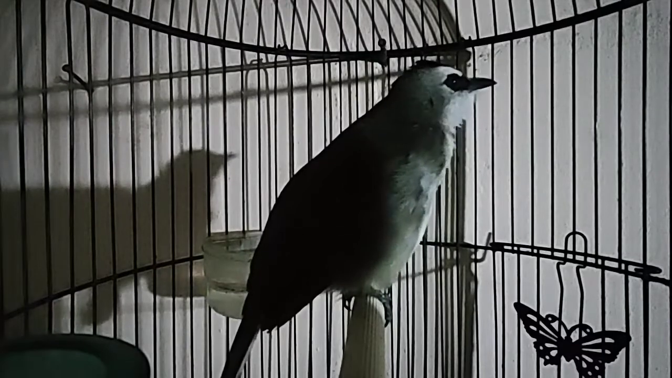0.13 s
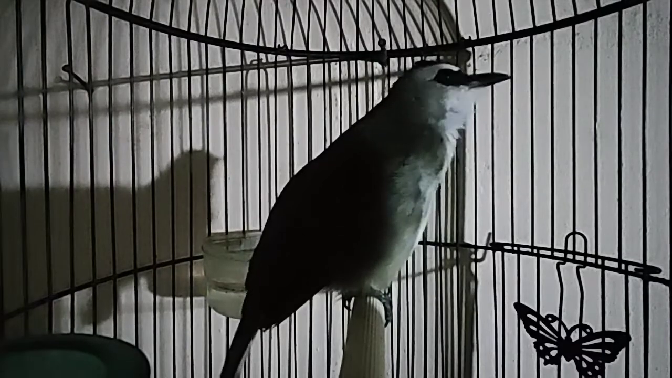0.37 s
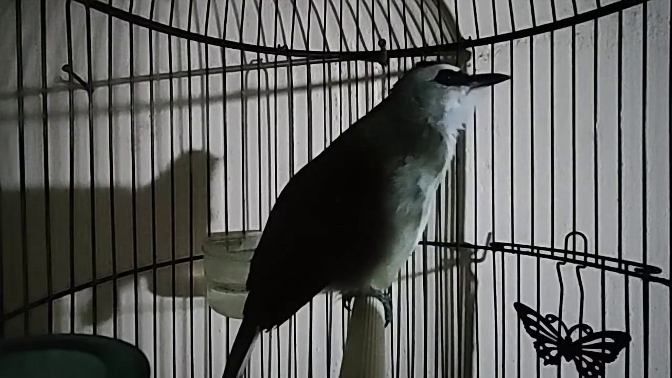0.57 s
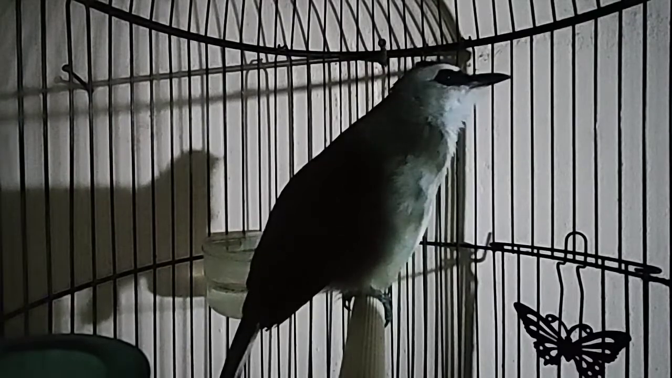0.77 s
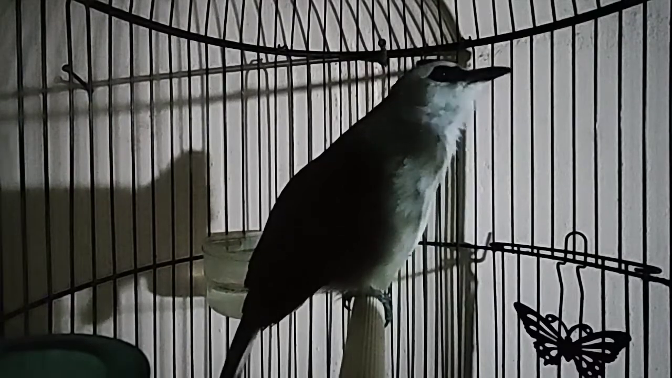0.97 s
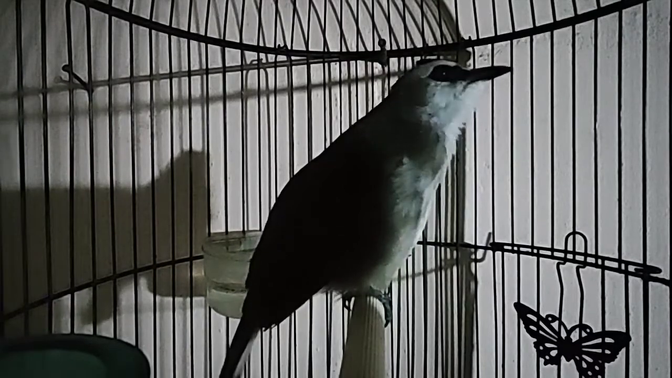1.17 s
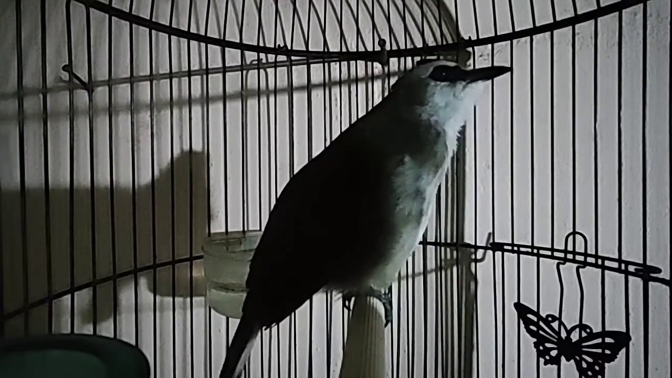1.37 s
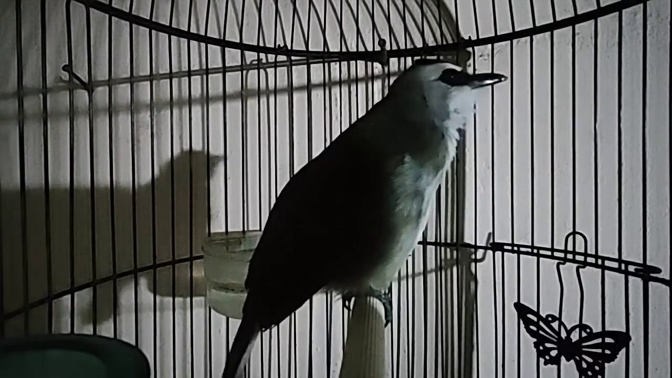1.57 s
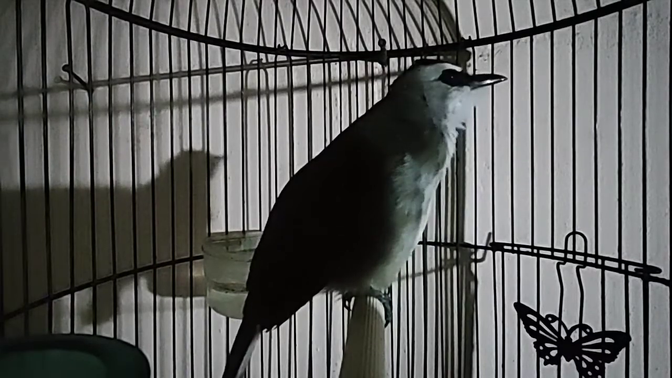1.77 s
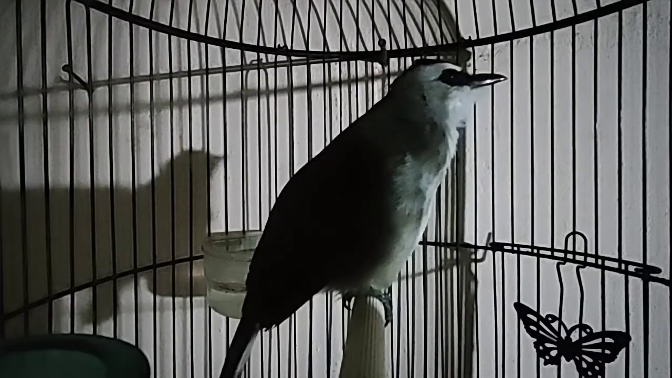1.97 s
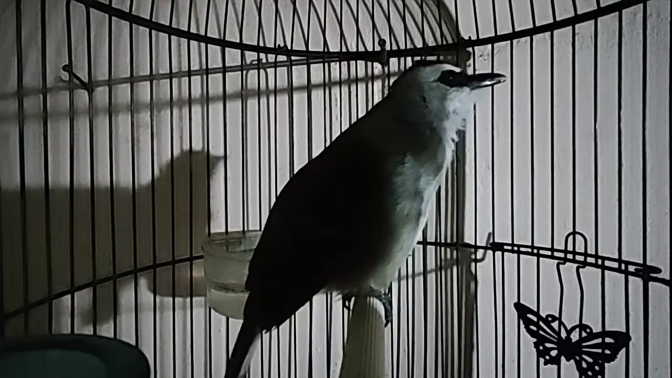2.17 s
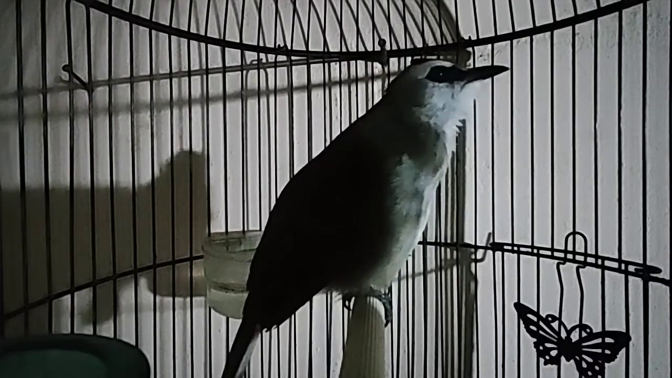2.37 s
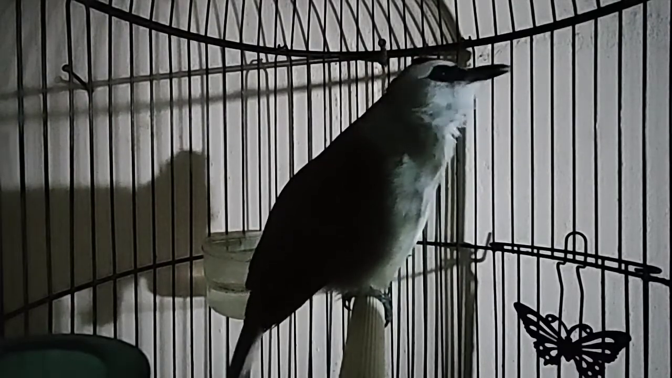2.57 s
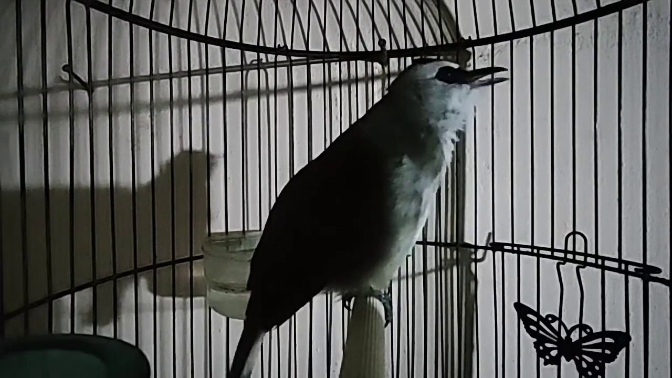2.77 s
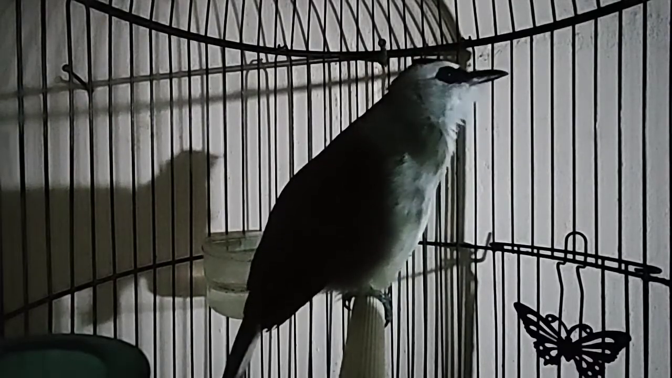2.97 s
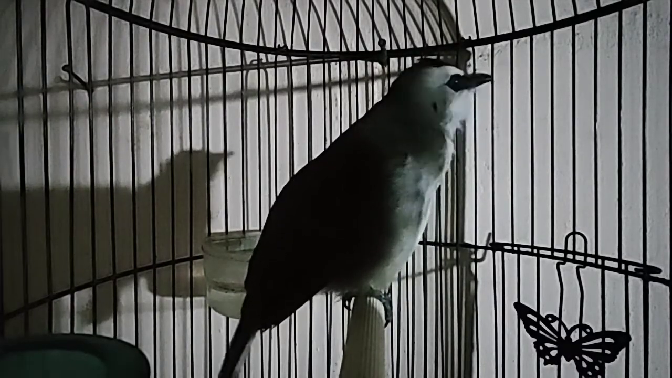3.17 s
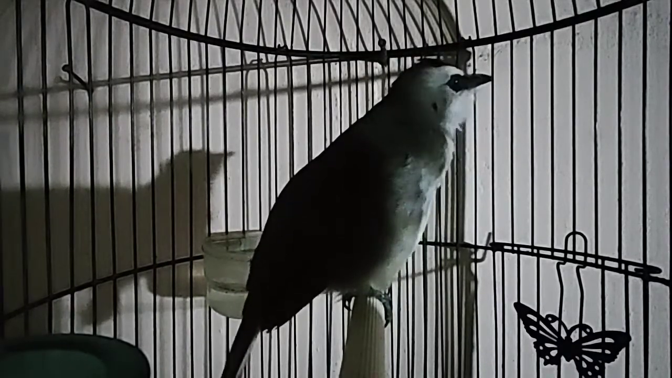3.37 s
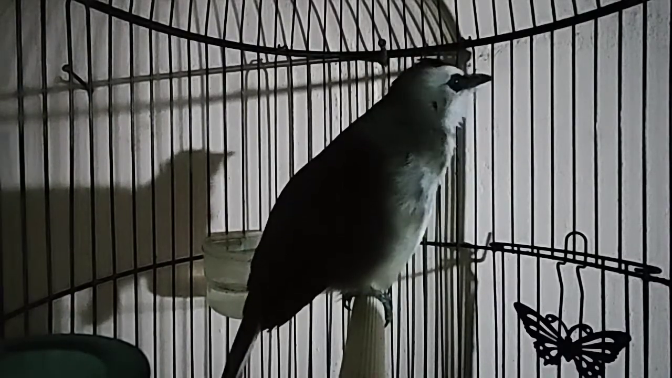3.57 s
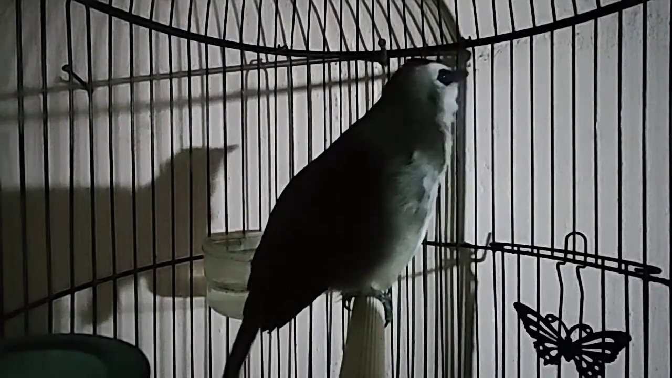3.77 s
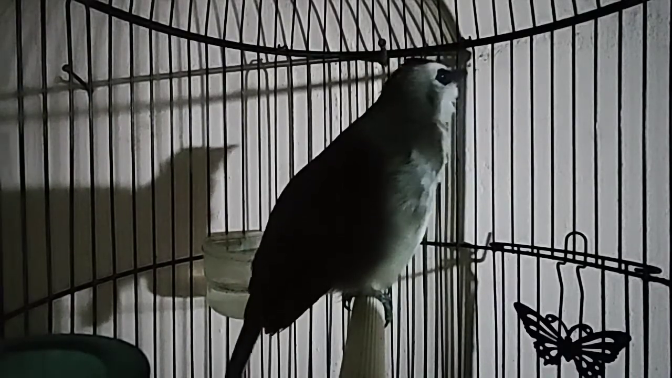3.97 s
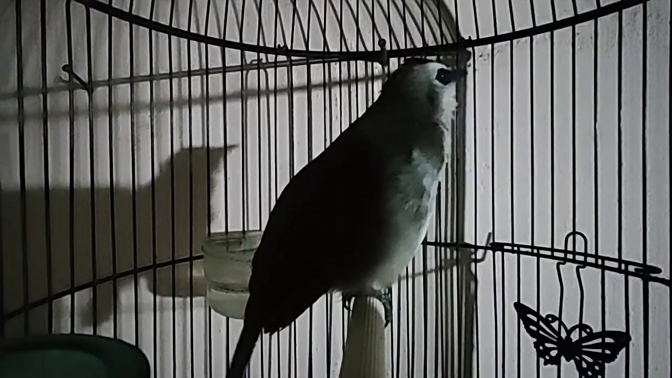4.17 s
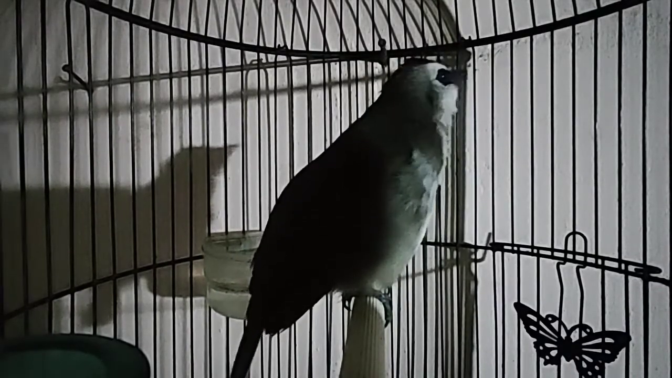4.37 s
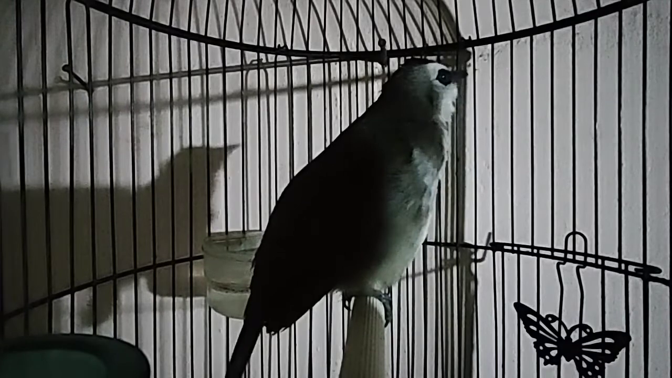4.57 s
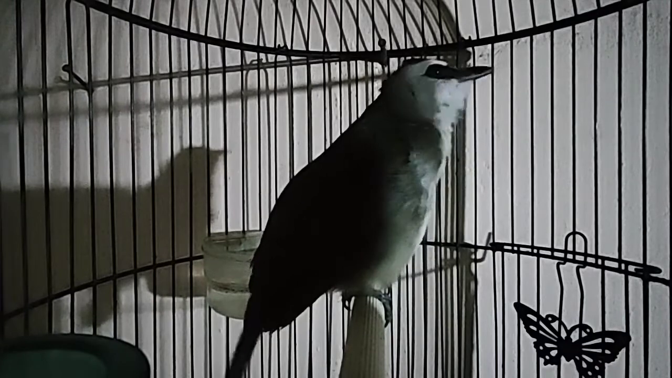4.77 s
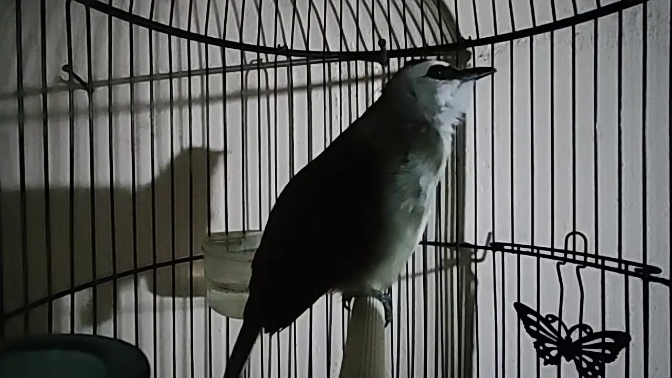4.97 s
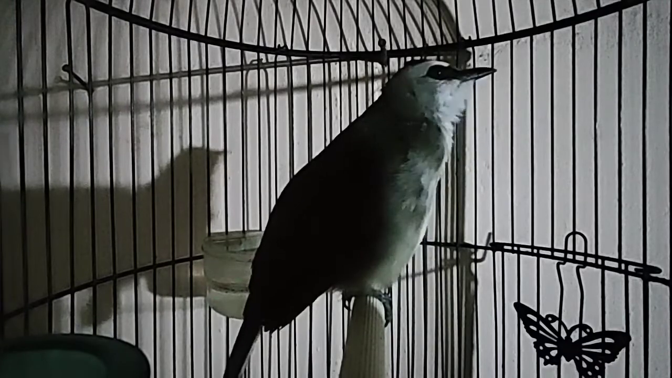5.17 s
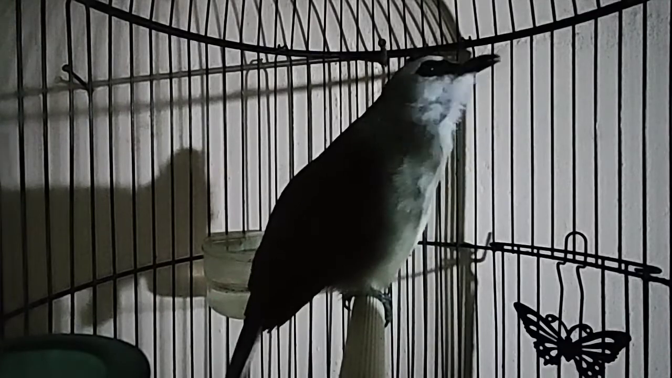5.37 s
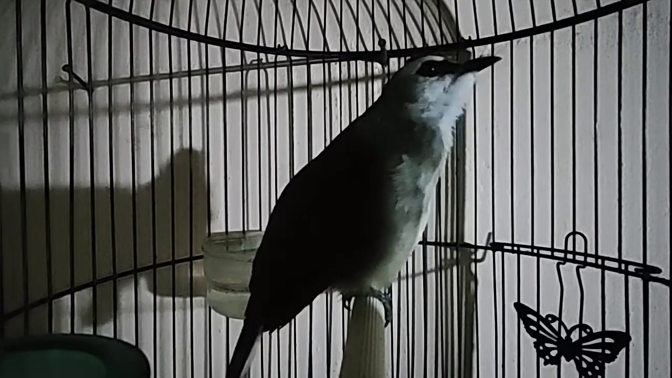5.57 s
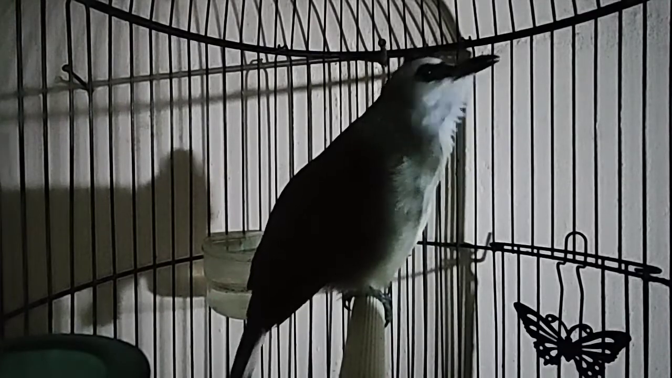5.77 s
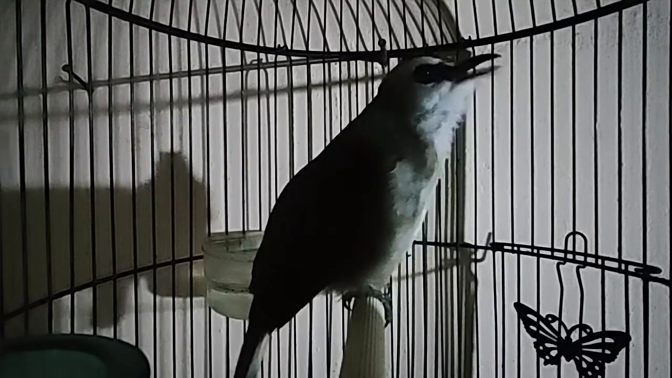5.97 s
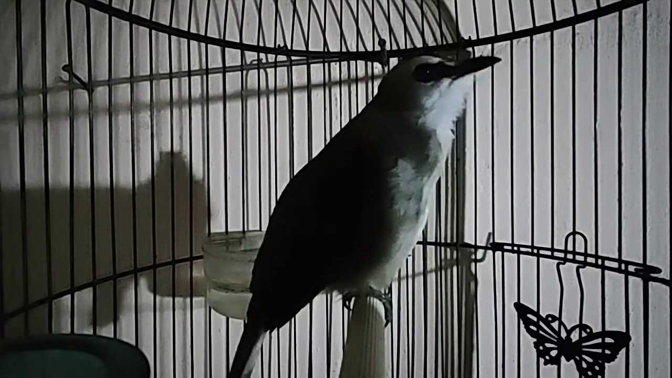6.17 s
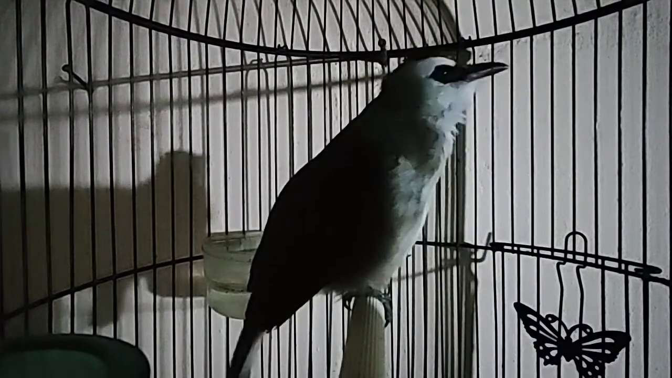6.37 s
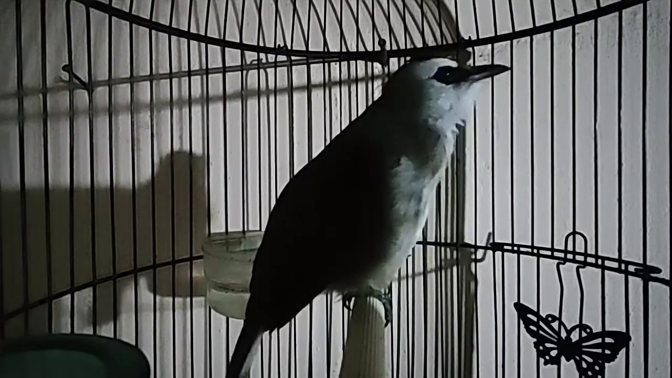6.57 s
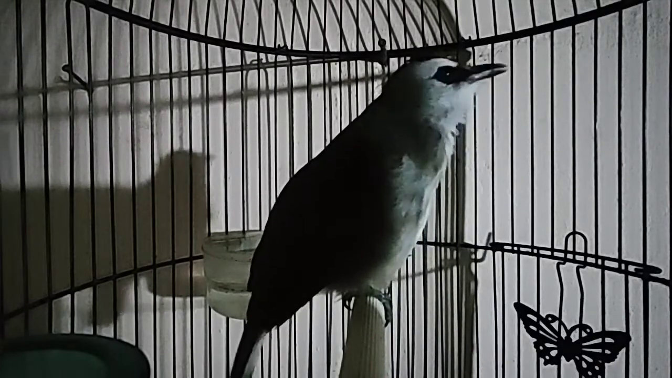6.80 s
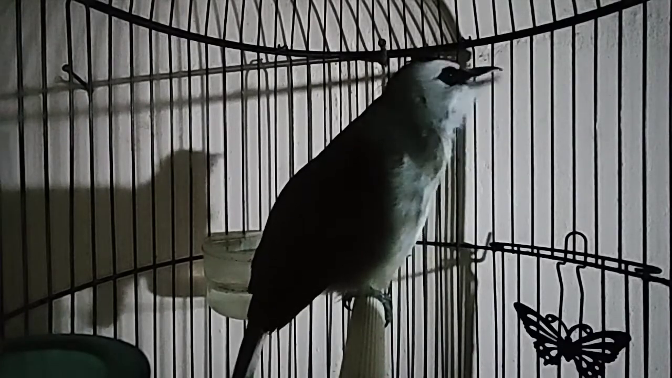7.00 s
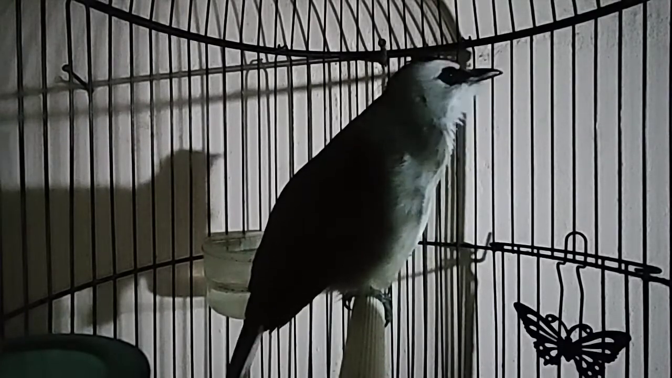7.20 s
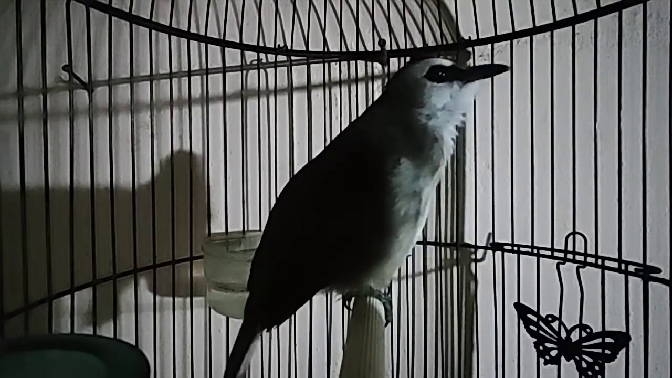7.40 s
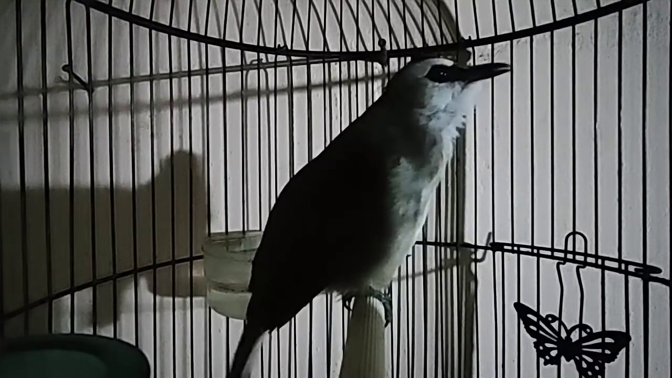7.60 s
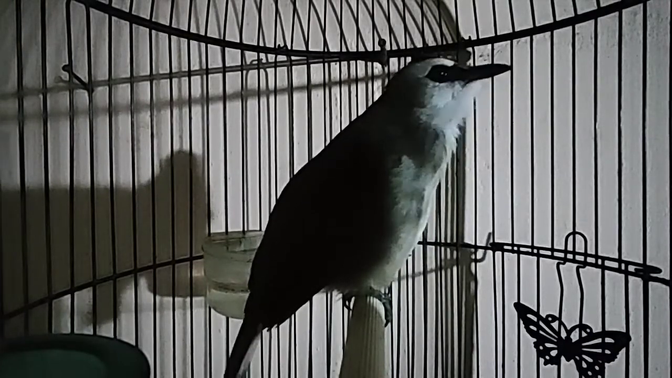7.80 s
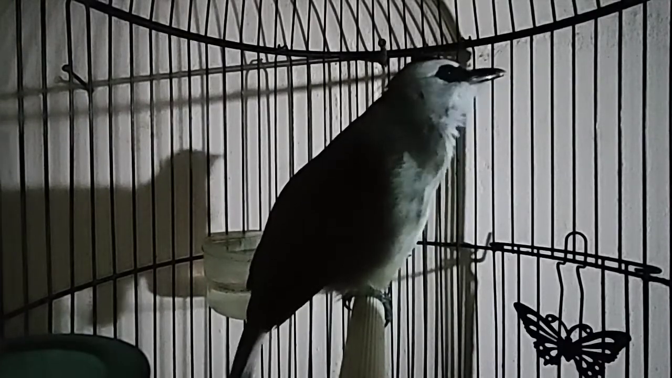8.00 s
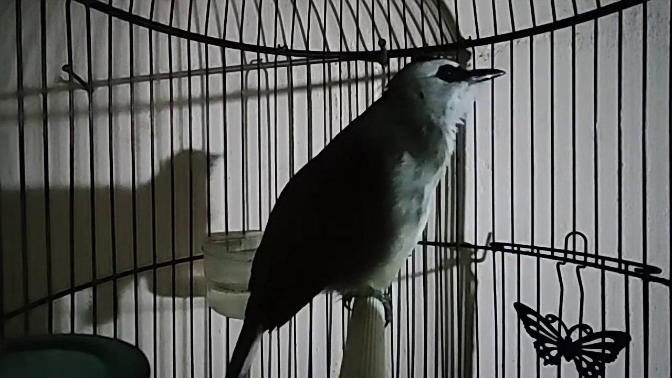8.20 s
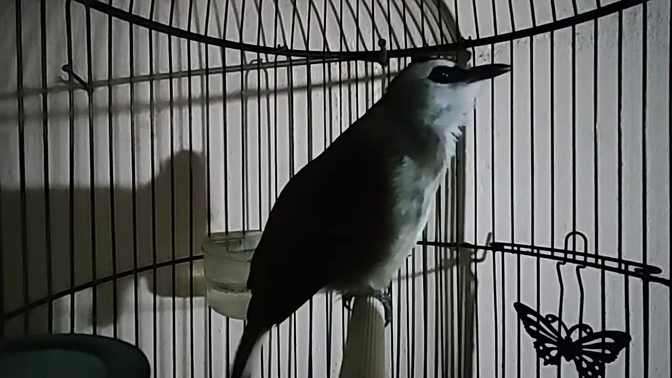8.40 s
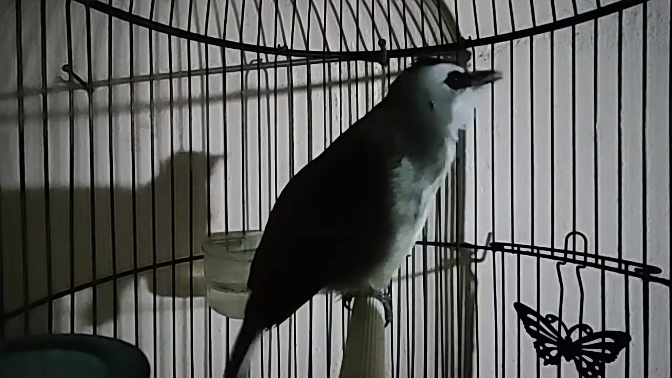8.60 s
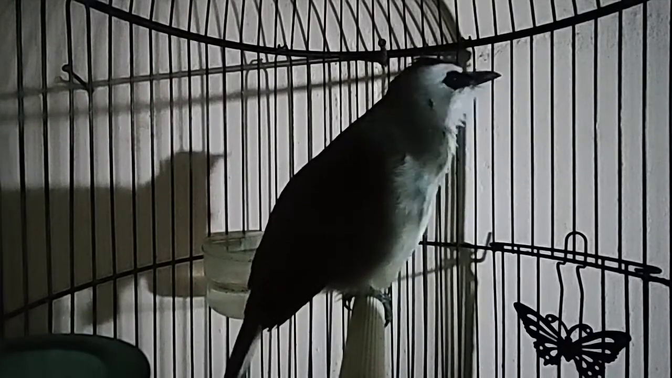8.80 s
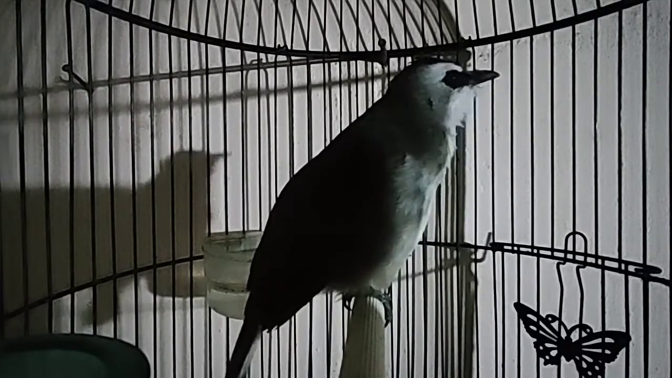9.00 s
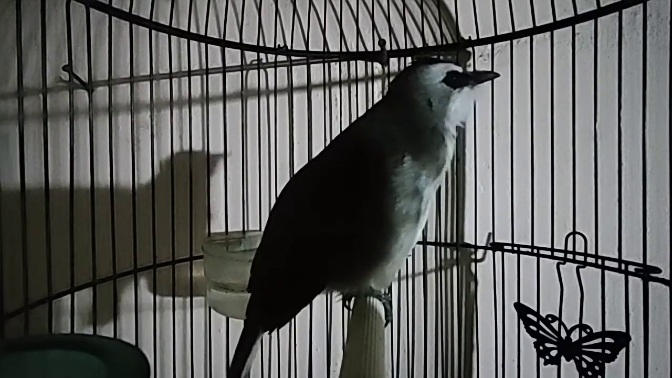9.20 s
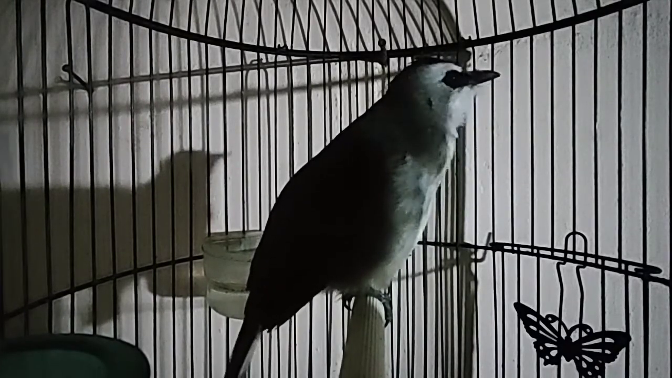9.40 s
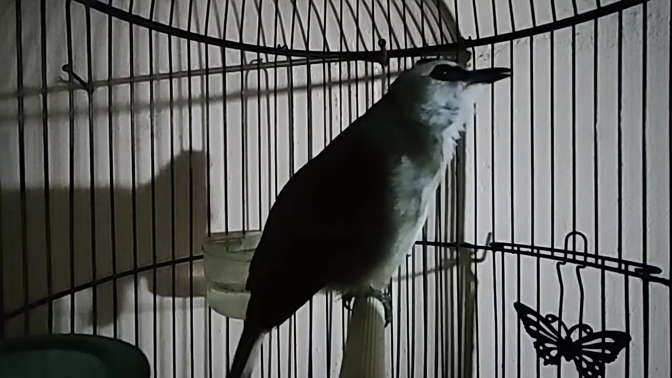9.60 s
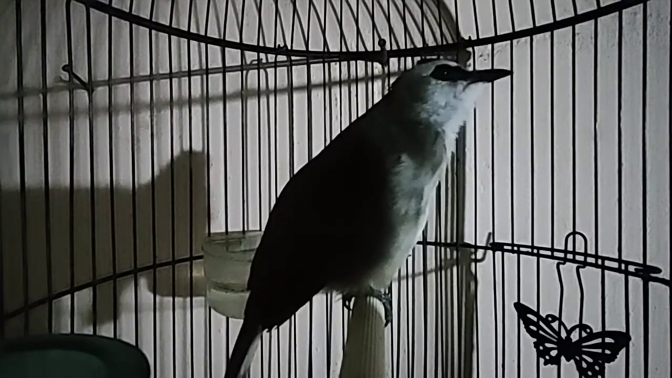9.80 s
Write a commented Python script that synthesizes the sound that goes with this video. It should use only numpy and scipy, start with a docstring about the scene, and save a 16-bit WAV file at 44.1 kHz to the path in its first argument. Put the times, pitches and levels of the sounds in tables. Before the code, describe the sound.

Steady two-note bird phrases, a low raspy chirp then a bright upward whistle with a buzzing trill, ring in a small reflective room.

```python
"""A whistle opens at once; then a caged bulbul repeats a two-note phrase, close up in a small hard-walled room.
Each phrase is a low hoarse chirp, then a loud whistle that dips and leaps into a fast buzzing trill.
The notes are gliding tones, trilled by a slower vibration, with buzzing overtones and breath noise.
A decaying noise tail rings on after every note, to the last whistle.
Far off outside, one engine swells and fades: low firing harmonics, noise puffs and a higher hum, over room tone."""
import sys
import numpy as np
from scipy import signal
from scipy.fft import rfft, irfft, next_fast_len
from scipy.io import wavfile
from scipy.ndimage import uniform_filter1d, minimum_filter1d

SR = 44100
rng = np.random.default_rng(int(sys.argv[2]) if len(sys.argv) > 2 else 0)


def transcribe(u):
    """Save the signal u as a 16-bit wav file named by the first command-line argument.

    u: samples, shape (n,) or (channels, n), limited to [-1, 1]; the rate is SR.
    q: integer samples, one column per channel.
    """
    v = np.clip(np.atleast_2d(u).T, -1, 1)
    q = np.round(v * 32767).astype(np.int16)
    wavfile.write(sys.argv[1], SR, q)


N = 434385
TIME = np.arange(N) / SR  # seconds

# Room tone spectrum, relative: frequency_hz, density_db (per Hz)
ROOM_TONE_SPECTRUM = [(20, 1.5), (60, -1), (110, -3), (190, -11.5), (270, -9.5), (380, -20.5), (700, -20),
                      (1100, -19), (3000, -28), (6000, -30), (9500, -24.5), (14000, -39)]
# Far motorbike, low firing harmonics: time_s, engine_cycle_rate_hz, level_db (before the trim in motorbike)
MOTORBIKE_RUN = [(0, 24.3, -50), (.66, 24, -42), (.8, 21.7, -38.5), (1.3, 19.8, -41), (1.6, 18.5, -49),
                 (2.6, 20.5, -56), (3.02, 20, -35), (3.6, 19.4, -39), (4.2, 18.5, -40.5),
                 (4.6, 16.8, -46.5), (5.3, 17.5, -51), (6, 18, -64.5), (7.2, 21, -65), (7.55, 23, -48.5),
                 (8.4, 19.5, -56), (9.85, 19, -68.5)]
# The higher hum of the same engine: time_s, hum_rate_hz, level_db (before the trim in motorbike)
HUM_RUN = [(0, 147.5, -53), (.65, 144, -45.5), (.9, 141.2, -54), (2.5, 138, -64.5), (9.85, 133, -70)]
# Exhaust colour as heard through the wall: frequency_hz, gain_db
EXHAUST_COLOUR = [(25, -20), (42, -14.5), (58, 0), (78, -7.5), (100, -7), (125, -20.5), (180, -26),
                  (280, -32.5), (400, -48), (900, -71)]
# Room decay by band: frequency_hz, t60_s
ROOM_DECAY = [(500, 0.32), (1400, 0.52), (2200, 0.51), (5000, 0.58), (9500, 0.52), (14000, 0.13)]
# The two microphone ports hear the bird differently:
# frequency_hz, left_minus_right_db, left_lag_rad (before scaling by lateness)
PORT_DIFFERENCES = [(500, 1, .1), (1900, 1.1, 0.23), (4540, 0, 1.63), (7640, 2.5, 2.07), (8580, -8.5, 2.1),
                    (9600, 4, 2.06), (9830, 7.5, 1.34), (10800, 9.5, 1), (12000, 2, 0.71)]
# Turbulent air in the throat: frequency_hz, gain_db
THROAT_AIR_COLOUR = [(350, -40), (750, -7.5), (1200, -13), (2100, 9), (2900, -8), (4500, -2.5),
                     (6000, -9.5), (7500, -17.5), (12000, -37)]
# Throat and open beak favour the overtones near 9.5 kHz: frequency_hz, gain_db
BEAK_COLOUR = [(300, -41.5), (700, -18), (1100, -12.5), (2700, -11), (4200, -21), (5200, -22.5),
               (6800, -27), (7900, -15.5), (8600, -5), (9500, 3.5), (10800, -7), (11500, -24.5),
               (12300, -47), (14000, -29.5)]
# Hoarse chirps, levels relative: leap_s, length_before_leap_s, length_after_leap_s, pitch_hz,
# trill_pitch_hz, level_db, trill_level_db, overtones_db
CHIRP_NOTES = [(0.442, 0.047, 0.056, 1413, 1464, -19, -18, -19.5),
               (1.044, 0.035, 0.056, 1407, 1684, -18, -16.5, -19),
               (1.631, 0.032, 0.073, 1455, 1560, -19.5, -16, -19),
               (2.2, 0.036, 0.054, 1419, 1635, -18.5, -17.5, -20),
               (2.739, 0.032, 0.06, 1467, 1753, -19, -14.5, -15.5),
               (3.279, 0.045, 0.049, 1450, 1698, -16, -15.5, -17),
               (3.842, 0.04, 0.065, 1450, 1810, -19, -16.5, -16.5),
               (4.361, 0.036, 0.049, 1451, 1552, -21.25, -16.0, -20),
               (4.887, 0.04, 0.056, 1450, 1732, -14.5, -17, -15.5),
               (5.44, 0.037, 0.056, 1480, 1684, -18.5, -16.5, -19.5),
               (5.958, 0.038, 0.054, 1424, 1692, -17, -17, -13.5),
               (6.473, 0.03, 0.068, 1409, 1711, -17.5, -16, -14),
               (6.986, 0.034, 0.058, 1427, 1509, -20, -17, -16),
               (7.505, 0.041, 0.047, 1456, 1844, -17, -13, -14.5),
               (8.015, 0.038, 0.042, 1419, 1707, -14.5, -15.5, -14),
               (8.515, 0.038, 0.054, 1470, 1682, -15.5, -16.5, -16.5),
               (9.054, 0.035, 0.044, 1385, 1447, -19.75, -17, -15),
               (9.597, 0.034, 0.052, 1468, 1754, -18.5, -15, -14.5)]
# Loud whistles, levels relative: leap_s, length_before_leap_s, length_after_leap_s, trill_length_s,
# low_pitch_hz, trill_pitch_hz, closing_pitch_hz, low_level_db, high_level_db, dip_between_db, overtones_db
WHISTLE_NOTES = [(0.039, 0.061, 0.062, 0.024, 1925, 2145, 2136, -10.5, -10, -9.5, -17.0),
                 (0.623, 0.069, 0.061, 0.0251, 1878, 2118, 2162, -9, -9, -11, -19),
                 (1.228, 0.068, 0.08, 0.026, 1859, 1989, 2168, -8.5, -8, -14.5, -17),
                 (1.82, 0.07, 0.048, 0.024, 1869, 2190, 2142, -10, -9.5, -13.5, -16),
                 (2.381, 0.066, 0.059, 0.0277, 1904, 2230, 2230, -11.5, -9, -8, -17.5),
                 (2.916, 0.074, 0.064, 0.017, 1885, 2190, 2106, -6.5, -5.5, -12, -18),
                 (3.458, 0.07, 0.056, 0.0295, 1889, 2132, 2080, -11.5, -8, -16, -15.5),
                 (4.024, 0.064, 0.07, 0.017, 1890, 2260, 2226, -10.5, -9.5, -18, -19),
                 (4.551, 0.063, 0.063, 0.027, 1878, 2070, 2096, -12, -9.5, -12.5, -18.5),
                 (5.065, 0.065, 0.07, 0.022, 1846, 2103, 2125, -10.5, -7.5, -1.5, -17),
                 (5.615, 0.072, 0.056, 0.036, 1890, 2113, 2107, -7, -7.0, -15.0, -17.5),
                 (6.123, 0.063, 0.076, 0.038, 1830, 2133, 2109, -6, -6.5, -10.5, -16),
                 (6.645, 0.062, 0.069, 0.034, 1896, 2018, 2191, -8, -6, -7, -14),
                 (7.171, 0.076, 0.048, 0.018, 1840, 2150, 2008, -12.5, -7.0, -6, -17.0),
                 (7.684, 0.071, 0.062, 0.0195, 1896, 2173, 2075, -7, -7.5, -10, -15.5),
                 (8.201, 0.069, 0.061, 0.018, 1836, 2136, 2126, -10.0, -6, -9.5, -16),
                 (8.681, 0.069, 0.066, 0.033, 1935, 2153, 2135, -5.5, -6, -8.5, -14),
                 (9.259, 0.068, 0.061, 0.018, 1806, 2290, 2210, -11.0, -7.0, -11, -19.5),
                 (9.785, 0.072, 0.073, 0.028, 1883, 2107, 2096, -7.5, -7.5, -7.5, -18.5)]

ROOM_TONE_DB = -49.5
TOP_HZ = 14300
CHIRP_ATTACK_S, CHIRP_RELEASE_S = 0.018, 0.016
CHIRP_LEAP_S, CHIRP_TRILL_S, CHIRP_DROP_S = 0.0063, 0.018, 0.014
CHIRP_SAG_HZ_PER_S, CHIRP_END_RATIO = 4400, 0.955  # pitch of the ending over pitch of the opening
CHIRP_HOARSE, CHIRP_TRILL_HOARSE = 0.37, 0.876  # shares 0-1
CHIRP_ROUGHENS_S = 0.03  # time to lose the clean tone
WHISTLE_ATTACK_S, WHISTLE_RELEASE_S = 0.033, 0.018
DIP_AHEAD_S, DIP_WIDTH_S = 0.015, 0.011  # the slackening just before the leap
SWELL_DB, ACCENT_DB, ACCENT_S = 1.13, 2.5, 0.0082  # extra force in the opening swell and at the leap
WHISTLE_LEAP_S, TRILL_FADE_S = 0.008, 0.021
LOW_SAG_HZ_PER_S, HIGH_SAG_HZ_PER_S = 1200, 2100
WHISTLE_HOARSE, WHISTLE_TRILL_HOARSE = 0.085, 0.38  # shares 0-1


def undb(db):
    """Decibels to gain."""
    return 10 ** (np.asarray(db) / 20)


def unit(x):
    """Scale to rms 1."""
    return x / np.sqrt(np.mean(x ** 2))


def lookup(points, hz):
    """Read (Hz, value) points on a log-frequency axis."""
    at, value = np.transpose(points)
    return np.interp(np.log(hz + 1), np.log(at), value)


def shape(x, response):
    """Filter by a complex gain, given as a function of frequency."""
    size = next_fast_len(N + 4096)
    hz = np.arange(size // 2 + 1) * SR / size
    return irfft(rfft(x, size) * response(hz), size)[..., :N]


def colour(x, points):
    """Filter by (Hz, dB) points."""
    return shape(x, lambda hz: undb(lookup(points, hz)))


def walk(rate):
    """Smooth random wander with a spread near 1, reaching a new target rate times a second."""
    steps = rng.standard_normal(N // 8)
    return 1.322 * np.interp(TIME * rate, np.arange(len(steps)), steps)


def ramp(t, length):
    """Smooth step from 0 at t = 0 to 1 at t = length."""
    return np.sin(np.pi / 2 * np.clip(t / length, 0, 1)) ** 2


def blend(a, b, share):
    """Go from a to b as the share goes from 0 to 1."""
    return a + (b - a) * share


def room_tone():
    """Faint town rumble and hiss; the bass is alike on both sides."""
    mid, side = colour(rng.standard_normal((2, N)), ROOM_TONE_SPECTRUM)
    side = colour(side, [(60, -9.0), (300, -6.5), (4000, 1.5)])
    stereo = mid + side * np.array([[1], [-1]])
    return unit(stereo) * undb(ROOM_TONE_DB + 0.22 * walk(1.6))


def engine(run, rough, level_db, count):
    """Harmonics and exhaust puffs, dulled by distance; rate and level follow the run."""
    s, rate, db = np.transpose(run)
    rate_hz = np.interp(TIME, s, rate) * (1 + 0.0083 * walk(12))
    phase = 2 * np.pi * np.cumsum(rate_hz) / SR
    firings = sum(np.cos(k * phase + k * k) for k in range(1, count + 1))
    # all the harmonics drift in level together
    firings = firings * undb(1.4 * walk(4.3))
    puffs = rng.standard_normal(N) * (1 + np.cos(phase))
    exhaust = unit(colour(firings, EXHAUST_COLOUR)) + rough * unit(colour(puffs, EXHAUST_COLOUR))
    return exhaust * undb(np.interp(TIME, s, db) + level_db)


def motorbike():
    """One far engine: its low firing harmonics, and a higher hum that belongs to it."""
    low = engine(MOTORBIKE_RUN, rough=0.32, level_db=-0.5, count=12)
    hum = engine(HUM_RUN, rough=0.23, level_db=0.5, count=2)
    return low + hum


def room(x, wet_db, early_db, early_s, likeness):
    """Quick reflections from the near wall, then a diffuse tail that dies fastest in the top treble."""
    t = TIME[:SR]
    noise = rng.standard_normal((3, SR))
    tails = np.zeros((2, SR))
    hz = np.arange(SR // 2 + 1.)
    centres = np.transpose(ROOM_DECAY)[0]
    for (centre, t60), weight in zip(ROOM_DECAY, np.eye(len(centres))):
        band = irfft(rfft(noise) * np.interp(hz, centres, weight), SR)
        # the ports hear the same low waves but different treble
        shared = np.clip(likeness, 0, 1) / (1 + (centre / 5500) ** 4)
        mixed = np.sqrt(shared) * band[2] + np.sqrt(1 - shared) * band[:2]
        tails += mixed * undb(-60 * t / t60)
    tails /= np.sqrt(np.sum(tails ** 2) / 2)
    onset = np.clip(t / 0.0018, 0, 1)
    strength = undb(wet_db) + undb(early_db) * np.exp(-t / early_s)
    return signal.fftconvolve(x, tails * onset * strength, axes=1)[:, :N]


def ports(x, lateness):
    """The bird sits a little to the right, so the left port hears it late."""
    side = np.array([[1], [-1]]) / 2
    at, tilt_db, lag = np.transpose(PORT_DIFFERENCES)

    def response(hz):
        tilt = undb(side * np.interp(hz, at, tilt_db))
        return tilt * np.exp(-1j * lateness * side * np.interp(hz, at, lag))

    return shape(x, response)


def air(loud, rough):
    """Turbulence that flutters and follows the force of the note."""
    return colour(loud * rng.standard_normal(N) * undb(rough * walk(200)), THROAT_AIR_COLOUR)


def chirp(t, before, after, hz, trill_hz, db, trill_db):
    """A sagging tone grows hoarse, jumps to a short trill, drops back and sags again; t counts from the leap."""
    trill = ramp(t + CHIRP_LEAP_S / 2, CHIRP_LEAP_S) * (1 - ramp(t - CHIRP_TRILL_S, CHIRP_DROP_S))
    opening = hz - CHIRP_SAG_HZ_PER_S * (t + before / 2)
    ending = hz * CHIRP_END_RATIO - CHIRP_SAG_HZ_PER_S * (t - (CHIRP_TRILL_S + after) / 2)
    pitch = blend(np.where(t < CHIRP_TRILL_S / 2, opening, ending), trill_hz, trill)
    envelope = ramp(t + before, CHIRP_ATTACK_S) * ramp(after - t, CHIRP_RELEASE_S)
    loud = envelope * undb(blend(db, trill_db, trill))
    hoarse = blend(CHIRP_HOARSE * ramp(t + before, CHIRP_ROUGHENS_S), CHIRP_TRILL_HOARSE, trill)
    return pitch, loud, trill, hoarse


def whistle(t, before, after, trill_s, low_hz, trill_hz, closing_hz, low_db, high_db, dip_db):
    """A clean tone swells, slackens, leaps with an accent, trills and settles; t counts from the leap."""
    leapt = ramp(t + WHISTLE_LEAP_S / 4, WHISTLE_LEAP_S)
    settled = ramp(t - trill_s + TRILL_FADE_S / 2, TRILL_FADE_S)
    trill = leapt * (1 - settled)
    low = low_hz - LOW_SAG_HZ_PER_S * (t + before / 2)
    closing = closing_hz - HIGH_SAG_HZ_PER_S * (t - (trill_s + after) / 2)
    high = blend(trill_hz, closing, settled)
    force_db = blend(low_db + SWELL_DB, high_db, ramp(t + DIP_AHEAD_S, DIP_AHEAD_S))
    force_db = force_db + dip_db * np.exp(-((t + DIP_AHEAD_S) / DIP_WIDTH_S) ** 2)
    force_db = force_db + ACCENT_DB * np.exp(-(t / ACCENT_S) ** 2)
    envelope = ramp(t + before, WHISTLE_ATTACK_S) ** 0.62 * ramp(after - t, WHISTLE_RELEASE_S) ** 0.95
    hoarse = blend(WHISTLE_HOARSE, WHISTLE_TRILL_HOARSE, trill)
    return blend(low, high, leapt), envelope * undb(force_db), trill, hoarse


def gestures(notes, gesture):
    """Lay out the notes as pitch, loudness, trill depth, hoarseness, overtone dB and time from the leap."""
    controls = np.zeros((6, N))
    for leap, before, after, *form, bright_db in notes:
        span = slice(*np.searchsorted(TIME, [leap - before, leap + after]))
        t = TIME[span] - leap
        controls[:4, span] = gesture(t, before, after, *form)
        controls[4, span], controls[5, span] = bright_db, t
    return controls


def syrinx(notes, gesture, beat_hz, quicken, swing_hz, choke, jitter, halves_db, hiss_db, rasp_db,
           lead_db, lead_s, overtone_db, low_overtones_db, upper_db, tone_db, opening_db, pan_db):
    """A nearly pure membrane tone; in the trill a second, slow vibration swings its pitch and chokes it."""
    hz, loud, depth, hoarse, bright_db, since = gestures(notes, gesture)
    # the opening of a note is duller than the rest
    bright_db = bright_db + opening_db * ramp(-since, 0.012)
    # the trill quickens as it runs
    flutter = 2 * np.pi * beat_hz * since * (1 + quicken * since) + 0.85 * walk(70)
    unsteady = 1 + 0.011 * walk(110) + jitter * hoarse * walk(1300)
    hz = hz * unsteady + swing_hz * depth * np.sin(flutter)
    phase = 2 * np.pi * np.cumsum(hz) / SR
    # the tone is weakest on each downward swing
    tone = np.sin(phase) * (1 + choke * depth * (np.cos(flutter - 0.5) + 1.37 * walk(300)))

    # the membranes touch once a cycle, which adds overtones, each wavering in level
    overtones = np.zeros(N)
    for k in range(2, 9):
        level_db = low_overtones_db * (k < 4) + upper_db * (k > 5) + 2.4 * walk(45) + 2.5 * walk(260)
        overtones += np.sin(k * phase + k * k) * undb(level_db)
    # alternate cycles differ a little, which adds half lines that come and go
    halves = sum(np.sin((k + 0.5) * phase + k * k) for k in range(8)) * undb(4.6 * walk(30))
    hiss = hoarse * rng.standard_normal(N) * (1 + np.cos(phase))
    edge = overtones + undb(halves_db) * halves + undb(hiss_db) * hiss
    edge = edge * undb(bright_db + overtone_db + 2 * walk(90))

    # air already moves a moment before the membranes start to sing
    ahead = np.interp(TIME + lead_s, TIME, np.minimum(loud, 0.06))
    breath_colour = [(500, -38.5), (950, -3.5), (1300, 7.0), (1900, 2), (3000, -27.0)]
    lead = colour(ahead * rng.standard_normal(N), breath_colour)
    rasp = air(loud * np.sqrt(np.abs(hoarse)), rough=2.5)
    throat = undb(rasp_db) * rasp + undb(lead_db) * lead
    voice = np.sqrt(2) * (undb(tone_db) * loud * tone + colour(loud * edge, BEAK_COLOUR) + throat)
    return voice * undb(np.array([[pan_db], [-pan_db]]) / 2)


def bird():
    """One voice, two settings: hoarse, deeply choked chirps and cleaner, louder whistles."""
    chirps = syrinx(
        CHIRP_NOTES, chirp, beat_hz=139.7, quicken=0.88, swing_hz=172, choke=0.4, jitter=0.0148,
        halves_db=-9, hiss_db=2.5, rasp_db=-17, lead_db=-12.5, lead_s=0.02, overtone_db=-0.9,
        low_overtones_db=3, upper_db=-13, tone_db=-0.4, opening_db=-2.5, pan_db=0.5)
    whistles = syrinx(
        WHISTLE_NOTES, whistle, beat_hz=154, quicken=1.24, swing_hz=187, choke=0.14, jitter=0.014,
        halves_db=-12.0, hiss_db=-4.5, rasp_db=-24.5, lead_db=-18, lead_s=0.015, overtone_db=-2.0,
        low_overtones_db=1.0, upper_db=1.0, tone_db=-0.92, opening_db=-3.0, pan_db=-1.5)
    return chirps + whistles


def scene():
    """The bird and its room over the far motorbike."""
    song = bird()
    echo = room(song, wet_db=-17.0, early_db=-11.0, early_s=0.029, likeness=0.32)
    return room_tone() + motorbike() + ports(echo, lateness=0.56) + ports(song, lateness=0.97)


def record(dry):
    """Peaks over full scale are eased down, then the treble above TOP_HZ is cut."""
    peak = -minimum_filter1d(-np.abs(dry).max(axis=0), 129)
    limited = dry / uniform_filter1d(np.maximum(peak, 1), 129)
    return signal.sosfilt(signal.ellip(8, 0.2, 70, TOP_HZ, fs=SR, output="sos"), limited)


dry = scene()
out = record(dry)
transcribe(out)
```